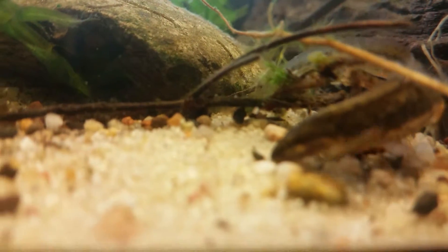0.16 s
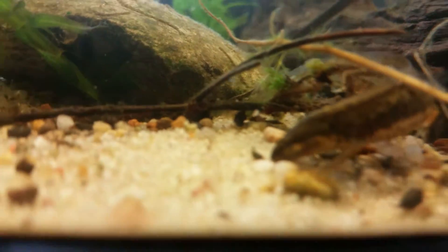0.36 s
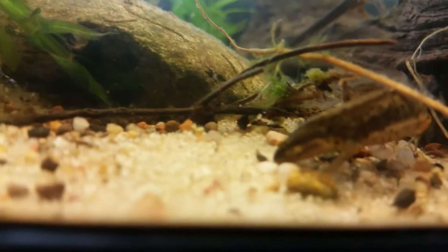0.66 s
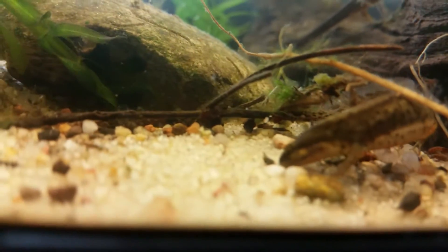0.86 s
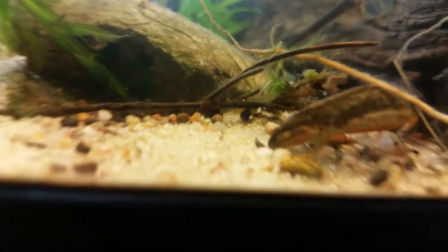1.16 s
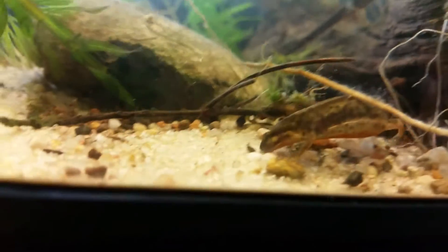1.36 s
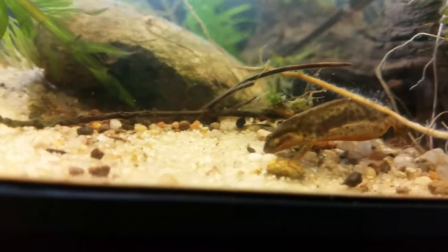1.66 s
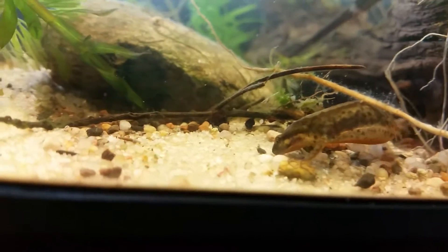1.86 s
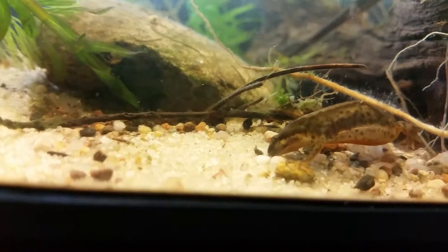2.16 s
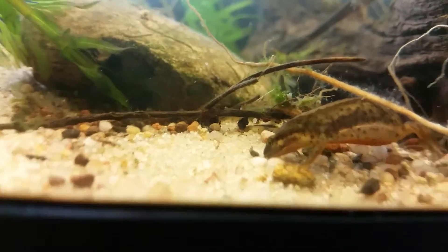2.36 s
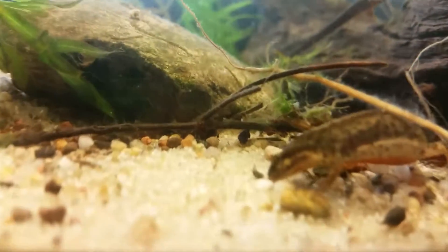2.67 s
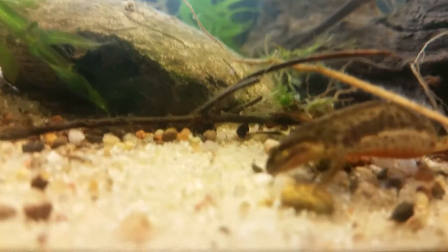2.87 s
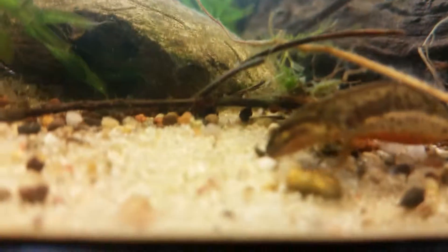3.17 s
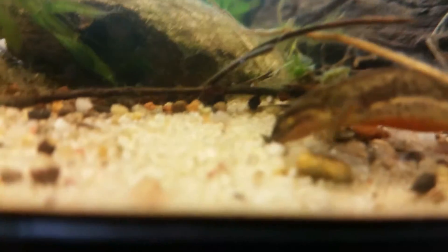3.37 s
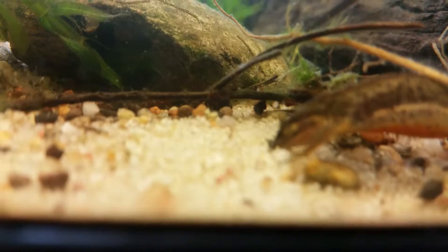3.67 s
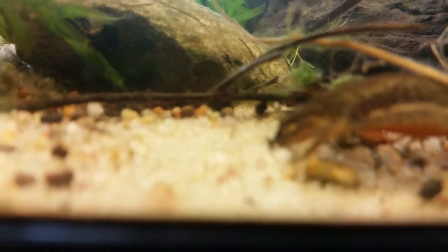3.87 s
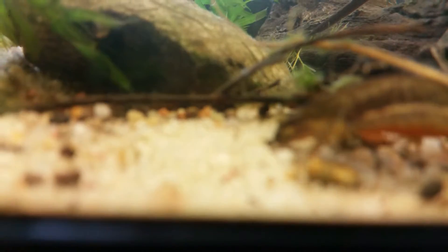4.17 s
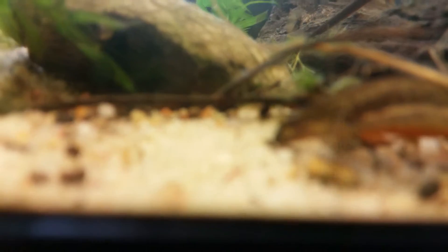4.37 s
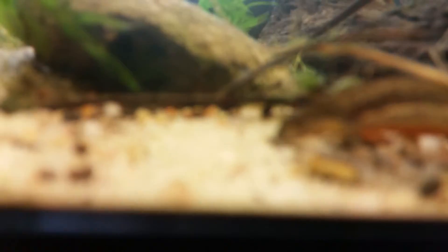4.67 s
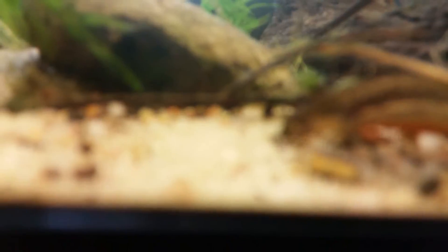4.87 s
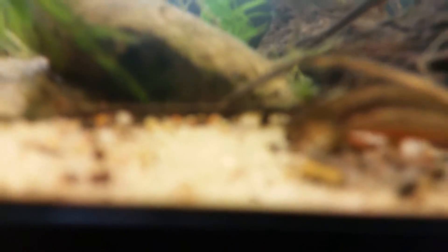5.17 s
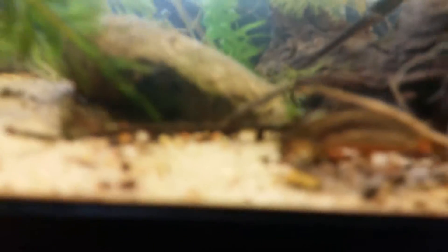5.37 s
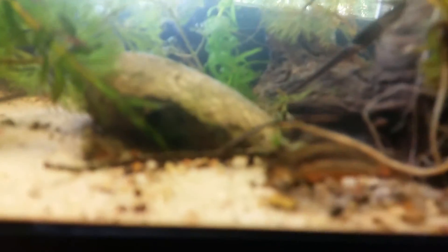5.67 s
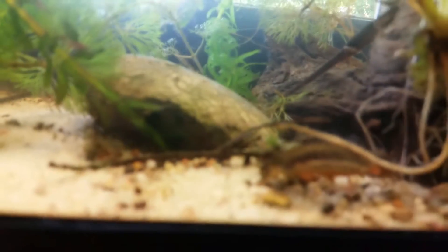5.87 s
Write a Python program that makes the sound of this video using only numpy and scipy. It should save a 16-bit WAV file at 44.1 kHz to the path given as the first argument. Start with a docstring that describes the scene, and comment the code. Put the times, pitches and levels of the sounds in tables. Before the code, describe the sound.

A phone rests against an aquarium front indoors, its left microphone partly covered by a hand. A quiet, low, fluttering pump hum and dull murmur run throughout, with thin, slowly swelling hiss. Small pops begin at 0.15 s; around 0.3 s a sharper tap and pop lead into low skin rumble and a falling creak at 0.4-0.55 s, then a tiny rising one near 0.7 s. At 1.2 s a hard thump brings shuddering rumble and a short rush of air, followed by taps at 1.3 and 1.5 s. It calms until 2.5 s. Stuttering rubs start at 2.7 s, a knock falls at 2.9 s, and thick pops crowd 3.0-3.2 s. Another stuttering run spans 3.3-3.5 s with a tap, ending in a pop at 3.6 s. Quieter rumble remains until the strongest, airy bump at 5.3 s, a last knock at 5.56 s, and a faint airy swell near 5.9 s.

```python
"""A hand slips over the left microphone port of a phone: bell-shaped pressure pops, a stuttering rub,
gliding creaks and low noise rumble. The case taps the glass now and then: jolts, thuds and short rings.
Place: the front of an aquarium, the phone held against it, two ports, no distance to the glass.
The pump hums as fluttering sines on the mains orders over a murmur of shaped noise.
Faint room hiss, shaped noise unrelated at the two ports, swells and sinks behind it all."""
import sys
import numpy as np
from scipy import signal
from scipy.io import wavfile
from scipy.ndimage import uniform_filter1d

SR = 44100
rng = np.random.default_rng(int(sys.argv[2]) if len(sys.argv) > 2 else 0)


def dump_mix(stems):
    """Bounce the given channels to the path in sys.argv[1] as a 16-bit WAV at rate SR."""
    frames = np.atleast_2d(stems).T  # one column per channel
    limited = np.clip(frames, -1, 1)  # hard clip at full scale
    pcm = np.round(limited * 32767).astype(np.int16)
    wavfile.write(sys.argv[1], SR, pcm)


def undo_db(level):
    """Turn decibels back into plain size, where 20 dB means ten times bigger."""
    steps = np.asarray(level, float) / 20
    return 10 ** steps


N = 265923
SECONDS = np.arange(N) / SR

# pressure pops at the left port, before its low cut: time_s, peak (push +, pull -), width_ms
POPS = [(0.141, -0.028, 0.78), (0.339, -0.06, 1.13), (0.358, -0.032, 2.8), (1.1571, 0.08, 1.9),
        (1.2257, 0.38, 2.03), (1.256, -0.2, 4.4), (2.5001, 0.06, 1.65), (2.9138, -0.079, 2.96),
        (3.0076, 0.06, 1.5), (3.0266, 0.14, 1.85), (3.1062, -0.38, 2.34), (3.1531, 0.15, 2.1),
        (3.161, 0.11, 1.5), (3.1675, 0.27, 2), (3.2037, -0.12, 1.8), (3.2116, -0.08, 1.8),
        (3.5904, -0.14, 1.43), (5.29, -0.16, 3.3), (5.3136, 0.69, 4.26), (5.3503, 0.06, 2.2)]
# stuttering rubs, before the low cut: first_peak, last_peak, first_width_ms, last_width_ms, slip times_s
STUTTERS = [(-0.11, -0.073, 1.87, 2.2, [2.6853, 2.713, 2.744, 2.771, 2.791]),
            (-0.068, -0.088, 1.55, 1.44, [3.2955, 3.3234, 3.348, 3.3737, 3.3976, 3.4227, 3.4549, 3.4848])]
# creaks of skin on the left port: start_s, length_s, first_slip_hz, last_slip_hz, level_db
CREAKS = [(0.421, 0.14, 158, 89.5, -42.5), (.67, .045, 134.7, 158, -45.5)]
# colour of the skin rumble: pitch_hz, relative level_db per Hz
RUMBLE_COLOUR = [(15, 0), (40, 2), (80, -2.5), (150, -4), (250, -13), (500, -33.5), (1000, -66)]
# course of the skin rumble: time_s, level_db
RUB_LEVEL = [(0, -58.5), (.3, -45.5), (.53, -45), (.62, -55.5), (.73, -50.5), (1.15, -78), (1.9, -61),
             (2.4, -63), (2.6, -56.5), (2.85, -53), (3.1, -44), (3.25, -58), (3.45, -41), (3.75, -52.5),
             (4.8, -56.5), (5.2, -57.5), (5.6, -51.5), (5.72, -74), (6.03, -60)]
# air and shudder setting in just before the hardest pops: start_s, air_db, air_t60_s, shudder_db, shudder_t60_s
PUFFS = [(1.218, -70.5, 0.88, -31.5, 0.52), (5.3, -69, 1.4, -30.5, 0.19)]
# colour of the rushing air: pitch_hz, relative level_db per Hz
AIR_COLOUR = [(800, -3), (2000, -5), (3600, -9), (5300, -25), (6500, -10), (9000, -20), (12300, -2),
              (14500, -8)]
# taps of the case, before the low cuts:
# time_s, left_jolt_db, right_jolt_db, right_thud_db, relative tick_db, hardness_db
TAPS = [(0.315, -43, -24, -54, -37, 11), (0.3264, -30, -39, -53, -56, -19),
        (1.278, -40.5, -32, -47, -42.5, -3.5), (1.325, -26, -41.5, -35, -42.5, -9),
        (1.5309, -66, -41.5, -44.5, -57, -16), (2.9022, -43, -34.5, -43, -46.5, -10),
        (3.4297, -28, -34, -29.5, -48, -12), (5.5593, -28.5, -42, -37, -43, -3)]
# ringing modes of the case: pitch_hz, relative level_db, t60_s
CASE_MODES = [(1400, -1.5, 0.0031), (2300, -1, 0.0032), (3650, -10, 0.0062), (5720, -15.5, 0.0014),
              (7020, -10.5, 0.0013), (7860, -19, 0.0016), (12700, 1.5, 0.0012), (14600, -5.5, 0.002)]
# ringing modes of the glass, before the hardness gain: pitch_hz, left_db, right_db, t60_s
GLASS_MODES = [(95, -36, -33, 0.037), (168, -33.5, -23.5, 0.04), (435, -37, -48.5, 0.048)]
# pump hum: mains order, left_db rms, right_db rms (steady part, before the swell),
# lead of the right port_rad, flutter share of the steady tone
HUM_ORDERS = [(2, -64.5, -69, -0.31, 0.3), (3, -57, -58, -0.27, .3), (4, -75.5, -75, -0.16, 0.5),
              (5, -75.5, -71.5, 1, 0.19), (6, -79, -75, -0.24, 0.28), (7, -80, -97.5, 1, 0.12),
              (8, -79, -71, 0.99, 0.28), (9, -63, -67.5, -0.047, 0.5), (10, -83.5, -76.5, 0.71, 0.57)]
# colour of the murmur of water and cabinet: pitch_hz, relative level_db per Hz
MURMUR_COLOUR = [(15, -7), (40, -2.5), (90, -5.5), (180, -7.5), (300, -14.5), (470, -17.5), (560, -22),
                 (650, -29), (900, -44.5), (1400, -47.5), (3000, -71.5)]
# left-right likeness of the murmur: pitch_hz, correlation (0 to 1)
MURMUR_LIKENESS = [(40, 0.15), (130, 0.21), (300, 0.72), (640, 0.32), (1400, 0.39)]
# slow swell of the hiss, shared in part by the upper hum orders: time_s, level_db
SWELL = [(0, -96.5), (.55, -100), (1.15, -102), (1.27, -94.5), (1.45, -95), (1.65, -99), (2, -100),
         (2.5, -95), (2.8, -92.5), (3.55, -93.5), (4.2, -97), (5.05, -97.5), (5.35, -91.5), (5.7, -97.5),
         (6.03, -95.5)]
# colour of the room hiss through each port: pitch_hz, level_db per Hz relative to the swell
HISS_LEFT = [(600, 5.5), (1200, -6.5), (2300, -4), (2900, -8), (3600, -1.5), (5000, -11.5), (5500, -20.5),
             (6700, -13), (7400, -17.5), (7900, -31), (9000, -38.5), (11200, -11), (12300, 0), (14500, -8)]
HISS_RIGHT = [(600, 8.5), (1200, -6), (2300, -7), (3500, -9), (4900, -7.5), (5900, -21), (6750, -6),
              (7300, -23), (7800, -6), (8500, -28), (10400, -16), (11400, -15.5), (12300, -3.5),
              (14500, -12.5)]
# changing colour of the hiss: time_s, broad middle lift_db, left port cavity lift_db
HISS_TINT = [(0, 3, 12.5), (1.15, 3, 16), (1.6, 4, 6.5), (2.3, 1.5, 8), (2.8, 4, 8), (3.55, 5.5, 7.5),
             (3.9, 3.5, -2), (4.7, 0.8, 1), (5.2, -2, 9), (5.6, 6, 3.5), (6.03, -1, 3.5)]


def evened(x):
    """Scales to rms 1."""
    return x / np.sqrt(np.mean(x ** 2) + 1e-20)


def course(points, s):
    """Reads a level in dB along time."""
    return np.interp(s, *np.transpose(points))


def read(points, hz):
    """Reads a spectrum on a log-frequency axis."""
    f, value = np.transpose(points)
    return np.interp(np.log(hz + 1), np.log(f + 1), value)


def steady(points):
    """A noise colour that stays the same through time."""
    return lambda hz, s: read(points, hz) + 0 * s


def unrelated(hz):
    """No likeness between the ports at any frequency."""
    return 0 * hz


def noise(shape_db, same, size, patchy_db):
    """Two channels of random short-time spectra; shape_db(hz, s) sets levels, same(hz) the likeness."""
    frames = 4 * N // size + 5
    hz = np.fft.rfftfreq(size, 1 / SR)[:, None]
    a, b, c, d, patches = rng.standard_normal((frames, len(hz), 5)).T
    patches = uniform_filter1d(patches, 10, 0)
    patches = evened(uniform_filter1d(patches, 10, 1))
    same = np.clip(same(hz), -1, 1)
    left = a + 1j * b
    right = same * left + np.sqrt(1 - same ** 2) * (c + 1j * d)
    frame_s = np.arange(frames) * size / 4 / SR
    spectra = np.array([left, right]) * undo_db(shape_db(hz, frame_s) + patchy_db * patches)
    return signal.istft(spectra, nperseg=size, noverlap=3 * size // 4)[1][:, :N]


def drift(rate):
    """Slow chance of rms 1: sines of random phase, up to rate a second."""
    t = np.arange(0, N, 64) / SR
    slow = sum(np.sin(2 * np.pi * (f * t + rng.random())) / np.sqrt(f)
               for f in np.geomspace(rate / 20, rate, 20))
    return np.interp(SECONDS, t, evened(slow))


def low_cut(x, hz, sharpness):
    """The microphone's low cut: second-order stages turn each push into a short falling ring."""
    w = 2 * np.pi * hz
    for q in sharpness:
        x = signal.lfilter(*signal.bilinear([1, 0, 0], [1, w / q, w ** 2], SR), x)
    return x


def add_push(mix, s, gain, width_ms, lean=0):
    """Adds a bell-shaped push of pressure at s; lean makes it rise faster than it falls."""
    at = np.arange(round(s * SR) - 1200, round(s * SR) + 1200)
    ms = (at / SR - s) * 1000
    mix[at] += gain * np.exp(-.5 * (ms / (width_ms * (1 + lean * np.sign(ms)))) ** 2)


def pops():
    """Single bells of pressure; a hard push starts with a sharp pull."""
    snap_share, snap_width_ms, least_push = 0.19, 0.72, 0.33
    pressure = np.zeros(N)
    for s, peak, width_ms in POPS:
        add_push(pressure, s, peak, width_ms, lean=0.17)
        if peak > least_push:
            lead_s = (3.1 + 1.15 * width_ms) / 1000
            add_push(pressure, s - lead_s, -snap_share * peak, snap_width_ms)
    return pressure


def stutters():
    """A rub that sticks and slips: runs of like pulls, each a little uneven in strength."""
    spread_db = 1.2
    pressure = np.zeros(N)
    for first, last, first_ms, last_ms, slips in STUTTERS:
        pulls = np.linspace((first, first_ms), (last, last_ms), len(slips))
        for s, (peak, width_ms) in zip(slips, pulls):
            uneven = undo_db(spread_db * rng.standard_normal())
            add_push(pressure, s, peak * uneven, width_ms, lean=0.12)
    return pressure


def creak(start, length, first_hz, last_hz, db):
    """Skin dragging over the port slips strong-weak: a gliding low tone with its half."""
    u = np.clip((SECONDS - start) / length, 0, 1)
    turns = 2 * np.pi * np.cumsum(first_hz + (last_hz - first_hz) * u) / SR
    half_db = -18 + 30 * u  # the half-rate tone grows from start to end
    tone = np.sin(turns) + undo_db(half_db) * np.sin(turns / 2)
    arch = np.sin(np.pi * u ** 0.63) ** 2  # peaks early
    return np.sqrt(2) * undo_db(db) * arch * tone


def skin_rumble():
    """Low patchy noise of skin on the port, with a dying shudder that sets in just before the hardest pops."""
    rise_s = 0.026
    skin = evened(noise(steady(RUMBLE_COLOUR), unrelated, size=2048, patchy_db=3.5)[0])
    level = undo_db(course(RUB_LEVEL, SECONDS))
    for s, _, _, db, t60 in PUFFS:
        fall = undo_db(db - 60 * abs(SECONDS - s) / t60)
        level += fall * np.clip((SECONDS - s) / rise_s, 0, 1)
    return skin * level * undo_db(0.5 * drift(rate=30))


def rushing_air():
    """Air rushing past the port, setting in just before the hardest pops: patchy noise that dies away."""
    air = evened(noise(steady(AIR_COLOUR), unrelated, size=256, patchy_db=5.5)[0])
    return air * sum(undo_db(db - 60 * abs(SECONDS - s) / t60) * (SECONDS > s) for s, db, t60, _, _ in PUFFS)


def hand():
    """All sounds of the hand at the left port, a little of them leaking to the right."""
    leak_db = -26.5
    pressure = low_cut(pops() + stutters(), 62, (.6, 1.05))
    left = pressure + skin_rumble() + rushing_air() + sum(creak(*row) for row in CREAKS)
    return np.array([left, undo_db(leak_db) * left])


def glass_ring(t):
    """Low decaying modes of the glass, opposite in sign at the two ports."""
    ring = sum(undo_db(np.array([[left_db], [right_db]]) - 60 * t / t60) * np.sin(2 * np.pi * hz * t)
               for hz, left_db, right_db, t60 in GLASS_MODES)
    return ring * [[-1], [1]]


def case_tick(t, hard_db):
    """Decaying modes of the case plus a noise rattle; hardness lifts the rattle and the high modes."""
    ring = -sum(undo_db(db + hard_db * (hz > 4500) - 60 * t / t60) * np.sin(2 * np.pi * hz * t)
                for hz, db, t60 in CASE_MODES)
    rattle_fade = undo_db(-37 - 60 * t / 0.036)
    room_fade = undo_db(-59 - 60 * t / 0.097)  # the room's short answer
    bright = np.diff(rng.standard_normal((2, len(t) + 1)))
    return ring + undo_db(hard_db) * (rattle_fade + room_fade) * bright


def taps():
    """A sharp inward jolt at each port, a slower thud on the right, the glass ring and a case tick."""
    jolt, thud, rings = np.zeros((3, 2, N))
    t = np.arange(4000) / SR
    pane = glass_ring(t)
    for s, left_db, right_db, thud_db, tick_db, hard_db in TAPS:
        add_push(jolt[0], s + 0.00061, -undo_db(left_db), .33)  # the left port lies farther from the contact
        add_push(jolt[1], s, -undo_db(right_db), .36)
        add_push(thud[1], s + 0.002, undo_db(thud_db), 1.3, lean=0.42)
        pan_db = -19.5 + 0.76 * (left_db - right_db)  # the tick leans to the port that takes the jolt
        tick = undo_db([[tick_db + pan_db], [tick_db]]) * case_tick(t, hard_db)
        rings[:, round(s * SR):][:, :len(t)] += tick
        glass_gain = undo_db(1.22 * (hard_db - 9.5))  # hard blows reach the glass
        rings[:, round((s + .0007) * SR):][:, :len(t)] += glass_gain * pane
    return low_cut(jolt + rings, 86, [.7]) + low_cut(thud, 36, [1.6])


def flutter(rate):
    """Complex chance of rms 1 for each port: noise averaged over 1/rate seconds."""
    a, b = uniform_filter1d(rng.standard_normal((2, 2, N)), int(SR / rate), axis=2)
    return (evened(a) + 1j * evened(b)) / np.sqrt(2)


def pump():
    """Steady orders of the mains, each with a fluttering skirt; the upper ones swell with the hiss."""
    mains_hz = 50.0
    hum = np.zeros((2, N))
    swell_db = 0.6 * (course(SWELL, SECONDS) + 95.5)  # dB of hum per dB of hiss about -95.5 dB
    for order, left_db, right_db, lead, share in HUM_ORDERS:
        port_phase = np.array([[0], [1j * lead]])
        turn = np.exp(2j * np.pi * (order * mains_hz * SECONDS + rng.random()) + port_phase)
        level = np.sqrt(2) * undo_db([[left_db], [right_db]]) * undo_db(swell_db * (order > 7))
        hum += level * (turn * (1 + share * flutter(rate=24))).real
    return hum


def murmur():
    """Broad low noise of water and cabinet around the hum, partly shared by both ports."""
    x = noise(steady(MURMUR_COLOUR), lambda hz: read(MURMUR_LIKENESS, hz), size=2048, patchy_db=1.4)
    return undo_db(-60.5) * evened(x)


def hiss():
    """Smooth room hiss, unrelated at the two ports; the covered left port rings as a small cavity."""
    when, body_db, cavity_db = np.transpose(HISS_TINT)
    cavity_hz, cavity_width_hz, body_hz, body_width_hz = 3553, 324, 1970, 3200
    rush_s, rush_span_s, rush_hz, rush_width_hz, rush_db = 5.9, .15, 1950, 420, 10  # late airy rush

    def shape_db(hz, s):
        """Port colours plus lifts that come and go."""
        body = np.interp(s, when, body_db) * np.exp(-.5 * ((hz - body_hz) / body_width_hz) ** 2)
        cavity = np.interp(s, when, cavity_db) / (1 + ((hz - cavity_hz) / cavity_width_hz) ** 2)
        ports = np.array([read(HISS_LEFT, hz) + cavity, read(HISS_RIGHT, hz) + 0.25 * cavity])
        away = ((s - rush_s) / rush_span_s) ** 2 + ((hz - rush_hz) / rush_width_hz) ** 2
        rush = rush_db * np.exp(-.5 * away)
        return ports + body + rush + course(SWELL, s)

    return noise(shape_db, unrelated, size=1024, patchy_db=1.33)


def scene():
    """Hand, case, pump, water and room together at the two ports."""
    return hand() + taps() + pump() + murmur() + hiss()


def roll_off(x):
    """The treble ends steeply here."""
    return signal.sosfilt(signal.butter(12, 15890, fs=SR, output="sos"), x)


def record(dry):
    """Limits the band of both ports with a steep low-pass at 14650 Hz."""
    edge = signal.firwin(1023, 14650, window=("kaiser", 6), fs=SR)
    mix = signal.oaconvolve(dry, edge[None], "same")
    return roll_off(mix)


dry = scene()
out = record(dry)
dump_mix(out)
```